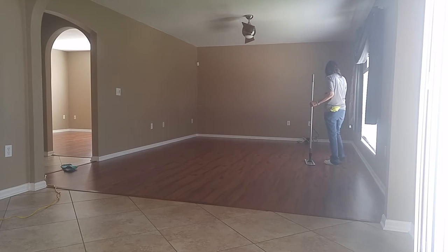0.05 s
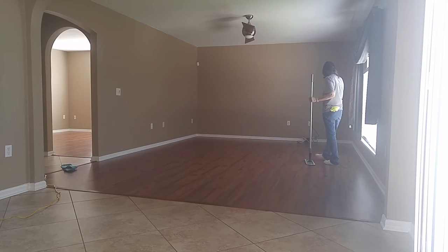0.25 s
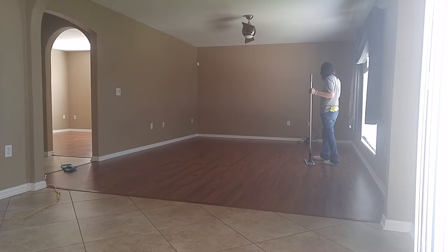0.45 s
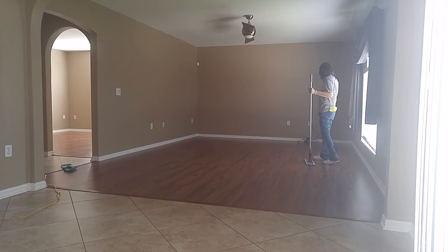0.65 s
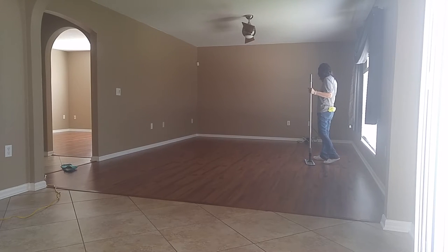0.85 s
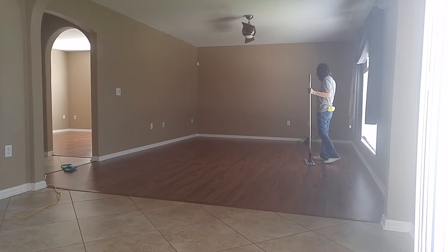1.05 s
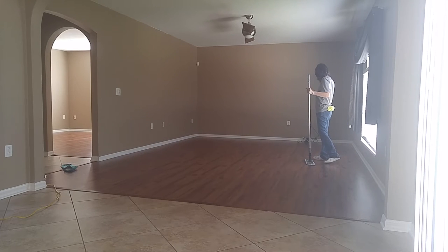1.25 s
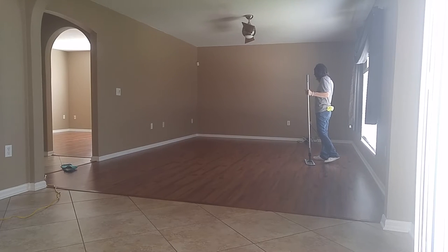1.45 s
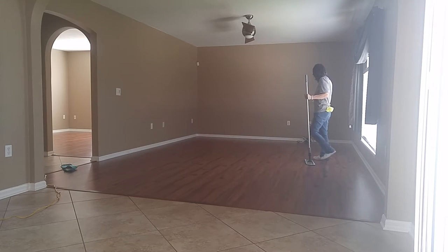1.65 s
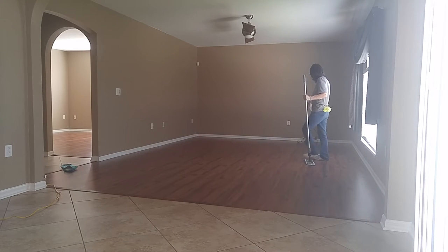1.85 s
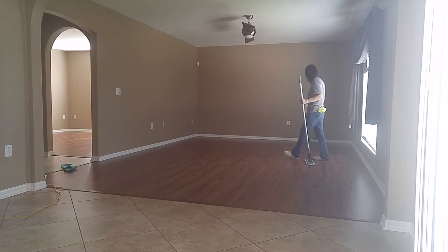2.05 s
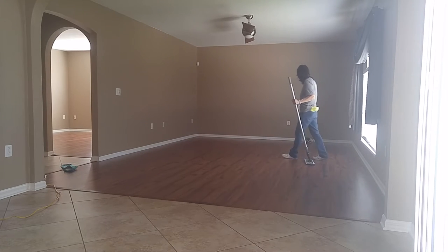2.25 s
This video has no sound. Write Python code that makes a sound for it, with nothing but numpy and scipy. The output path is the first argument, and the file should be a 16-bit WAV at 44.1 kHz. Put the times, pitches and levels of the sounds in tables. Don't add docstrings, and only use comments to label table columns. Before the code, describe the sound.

Mop head clacks on a hard floor with a loose rattle, ringing through a bare room

```python
import sys
import numpy as np
from scipy import signal
from scipy.fft import rfft, irfft, next_fast_len
from scipy.io import wavfile

SR = 44100
rng = np.random.default_rng(int(sys.argv[2]) if len(sys.argv) > 2 else 0)


def gain_from_db(level_db):
    decades = np.asarray(level_db, float) / 20
    return 10 ** decades


def to_wav(s):
    ch = np.atleast_2d(s).T
    pcm = np.round(np.clip(ch, -1, 1) * 32767)
    wavfile.write(sys.argv[1], SR, pcm.astype(np.int16))


N = 101429
SIZE = next_fast_len(2 * N)


def at_hz(points, hz):
    p = np.array(points)
    return np.interp(np.log(np.maximum(hz, 1)), np.log(p[:, 0]), p[:, 1])


def rms_one(x):
    return x / np.sqrt(np.mean(x ** 2))


def colour(x, db_of_hz):
    hz = np.arange(SIZE // 2 + 1) * SR / SIZE
    cepstrum = irfft(db_of_hz(hz) * np.log(10) / 20, SIZE)
    cepstrum[1:SIZE // 2] *= 2
    cepstrum[SIZE // 2 + 1:] = 0
    response = np.exp(rfft(cepstrum))
    return irfft(rfft(x, SIZE) * response, SIZE)[..., :N]


def clicks(rows):
    out = np.zeros(N)
    for s, db in rows:
        out[int(s * SR)] += gain_from_db(db)
    return out


def ring(x, modes):
    out = 0
    for k, (hz, db, t60) in enumerate(modes):
        radius = gain_from_db(-60 / (t60 * SR))
        angle = 2 * np.pi * hz / SR
        gain = (-1) ** k * gain_from_db(db) * np.sin(angle)
        poles = [1, -2 * radius * np.cos(angle), radius * radius]
        out = out + signal.lfilter([0, gain], poles, x + 1e-18)
    return out


CONTACT_HZ = 3560

# t/s, level/dB
KNOCKS = [
    (0.2043, -12),
]
# f/Hz, level/dB, T60/s
HEAD_MODES = [(231.5, -20.5, 0.058), (356.3, 2, 0.048), (399, 0, 0.035), (597, 1.5, 0.027),
              (747, -2, 0.034), (840, 2, 0.02), (1052, -0.5, 0.025), (1265, -0.5, 0.016),
              (1515, -1.5, 0.011), (1964, -4.5, 0.014), (2417, -5, 0.011), (2830, -7.5, 0.0065),
              (3994, -12, 0.025)]


def knock():
    push = signal.lfilter(*signal.butter(2, CONTACT_HZ, fs=SR), clicks(KNOCKS))
    crack = push * gain_from_db(-20)
    blow = ring(push, HEAD_MODES) * gain_from_db(-12) + crack
    return signal.sosfilt(signal.butter(2, 160, "high", fs=SR, output="sos"), blow)


# t/s, level/dB
RATTLE = [
    (0.2043, -35),
    (0.2095, -32),
    (0.2125, -31),
    (0.2155, -32),
]


def rattle():
    t60_s, low_hz, high_hz = 0.015, 2600, 10940
    decay = signal.lfilter([1], [1, -gain_from_db(-60 / (t60_s * SR))], clicks(RATTLE))
    bursts = decay * rng.standard_normal(N)
    band = signal.butter(3, [low_hz, high_hz], "band", fs=SR, output="sos")
    return gain_from_db(0.5) * signal.sosfilt(band, bursts)


# t/s, pressure as drag level/dB, speed as swish level/dB
STROKE = [(0, -49.5, -74), (.06, -50, -67), (.11, -46, -49.5), (.18, -52, -55.5), (.45, -52, -62),
          (.68, -50, -58), (.85, -52.5, -62.5), (.95, -58, -88), (1.08, -58.5, -62.5), (1.17, -51, -65),
          (1.24, -55.5, -92), (1.33, -59, -60), (1.45, -47, -61), (1.559, -49, -62), (1.67, -55, -57.5),
          (1.78, -57.5, -64), (2.0, -59.5, -59), (2.3, -64, -73)]
# f/Hz, level/dB per Hz
DRAG = [(120, -12.5), (300, -6.5), (800, 2.5), (1500, -5), (2200, -4), (3000, -21.5), (4500, -16.5),
        (8000, -40)]
# f/Hz, level/dB per Hz
SWISH = [(1500, -32), (3000, 4), (5000, 2.5), (7000, 4), (10000, 0.5), (13000, 2.5), (15000, 14.5),
         (17000, -28)]


def cloth():
    grains_per_s, grain_spread_db = 2500, 2.5
    squeak_hz, squeak_db, squeak_peak_s, squeak_s = 1736, -63, .1, .09
    s, drag_db, swish_db = np.transpose(STROKE)
    t = np.arange(N) / SR
    struck = rng.random((2, N)) < grains_per_s / SR
    grains = struck * gain_from_db(grain_spread_db * np.minimum(rng.exponential(1, (2, N)), 3))
    grains = rms_one(grains * rng.choice([-1, 1], (2, N))) + .8 * rng.standard_normal((2, N))
    drag = rms_one(colour(grains, lambda hz: at_hz(DRAG, hz)))
    drag = drag * gain_from_db(np.interp(t, s, drag_db))
    swish = rms_one(colour(rng.standard_normal((2, N)), lambda hz: at_hz(SWISH, hz)))
    swish = swish * gain_from_db(np.interp(t, s, swish_db))
    swell = np.exp(-((t - squeak_peak_s) / squeak_s) ** 2)
    squeak = gain_from_db(squeak_db) * np.sin(2 * np.pi * squeak_hz * t) * swell
    return ports(*(drag + swish + squeak))


# t/s, level/dB
CATCHES = [(1.44, -45), (1.456, -40), (1.474, -35), (1.521, -41), (1.561, -36), (1.6, -38)]
# f/Hz, level/dB, T60/s
SEAM_MODES = [(680, 0, .018), (980, -1, .015), (1500, -5, .012), (2100, -5, .012), (3400, -9, .008)]
# t/s, level/dB
REBOUND = (0.4075, -23)
# f/Hz, level/dB, T60/s
REBOUND_MODES = [(740, 0, .04), (960, -12, .03)]


def catches():
    soft = signal.butter(1, CONTACT_HZ, fs=SR)
    seams = ring(signal.lfilter(*soft, clicks(CATCHES)), SEAM_MODES)
    rebound = ring(signal.lfilter(*soft, clicks([REBOUND])), REBOUND_MODES)
    return seams + rebound


# t/s, level/dB
TICK = (1.8289, -12.5)
# lower f/Hz, upper f/Hz, level/dB
JOINT = [(6400, 7400, 0), (8300, 10500, -10), (2000, 6000, -17)]


def tick():
    out = 0
    for low_hz, high_hz, db in JOINT:
        band = signal.butter(2, [low_hz, high_hz], "band", fs=SR, output="sos")
        out = out + gain_from_db(db) * signal.sosfilt(band, clicks([TICK]) + 1e-18)
    return out


# f/Hz, share/1
LIKENESS = [(60, .99), (130, .9), (350, .94), (640, .5), (1400, .38), (3000, .25), (7000, .15), (15000, .1)]
# f/Hz, lag/s
LEFT_LAG_S = [(100, .00005), (600, .00012), (1400, .00034), (15000, .00032)]


def ports(a, b):
    hz = np.arange(SIZE // 2 + 1) * SR / SIZE
    alike = at_hz(LIKENESS, hz)
    delay = np.exp(-2j * np.pi * hz * at_hz(LEFT_LAG_S, hz))
    left = alike * rfft(a, SIZE) * delay + np.sqrt(1 - alike ** 2) * rfft(b, SIZE)
    return np.array([irfft(left, SIZE)[:N], a])


# f/Hz, T60/s
DECAY = [(100, 1.2), (300, 0.66), (700, 0.86), (1400, 1.12), (2500, .8), (5000, 0.6), (8000, 0.69),
         (12000, 0.28)]


def room(x, echoes, tail_db):
    hall_db, hall_t60_s, rise_s, echo_spread_s = -56.5, 3.1, .008, .0004
    t = np.arange(N) / SR
    edges = 60 * 2 ** np.arange(0, 8.3, .5)
    white = rng.standard_normal((2, 2, N))
    hall = gain_from_db(hall_db - 60 * t / hall_t60_s)
    tail = 0
    for k, (low, high) in enumerate(zip(edges, edges[1:])):
        half_octave = signal.butter(2, [low, high], "band", fs=SR, output="sos")
        band = signal.sosfilt(half_octave, white[k % 2])
        t60 = at_hz(DECAY, np.sqrt(low * high))
        tail = tail + band * (gain_from_db(tail_db - 60 * t / t60) + hall * (t60 / 0.72) ** 2)
    reflected = np.arange(len(echoes)) > 0
    lags = LEFT_LAG_S[-1][1] - echo_spread_s * rng.random(len(echoes)) * reflected
    left = clicks([(s + .0002 + lag, db) for (s, db), lag in zip(echoes, lags)])
    right = clicks([(s + .0002, db) for s, db in echoes])
    answer = ports(*(tail * (1 - np.exp(-t / rise_s)))) + [left, right]
    return irfft(rfft(answer, SIZE) * rfft(x, SIZE), SIZE)[:, :N]


# f/Hz, level/dB per Hz
AIR = [(25, -35), (60, 1.5), (100, -2.5), (260, -12.5), (800, -7.5), (2000, -19.5), (4000, -28),
       (15000, -35)]
# f/Hz, width/Hz, level/dB
HUM = [(64.7, 19, -62), (159.6, 16, -65), (256.8, 16, -62.5), (354.8, 9.4, -64)]
# t/s, level/dB
AIR_SWELL = [(0, 5.5), (.7, 1), (1.5, 1), (1.8, -3), (2.3, -2.5)]


def air():
    out = gain_from_db(-52.5) * rms_one(colour(rng.standard_normal((2, N)), lambda hz: at_hz(AIR, hz)))
    white = rng.standard_normal((2, N + SR))
    for hz, width_hz, db in HUM:
        out = out + gain_from_db(db) * rms_one(ring(white, [(hz, 0, 3.2 / width_hz)])[:, SR:])
    return ports(*out) * gain_from_db(np.interp(np.arange(N) / SR, *np.transpose(AIR_SWELL)))


# delay t/s, level/dB
ECHOES = [(0, -2), (.0025, 0), (.0058, -1), (.0095, -3), (.0178, -1), (.027, -3), (.043, -6)]
# delay t/s, level/dB
RATTLE_ECHOES = [(0, 0), (.0025, -4), (.0095, -7), (.0178, -9)]
# delay t/s, level/dB
TICK_ECHOES = [(0, -8), (.0027, -9), (.006, -11), (.0077, 0), (.0113, -5), (.0137, -10), (.0157, -5),
               (.0218, -6), (.0265, -11)]


def scene():
    near = room(knock(), ECHOES, -24) + room(rattle(), RATTLE_ECHOES, -27.5)
    far = room(catches(), RATTLE_ECHOES[:2], -37.5) + room(tick(), TICK_ECHOES, -26)
    return near + far + cloth() + air()


# f/Hz, level/dB
LEFT_PORT = [(900, -.5), (1400, -6), (2200, -4), (3200, 1), (5000, -4), (7000, -12), (9800, -16),
             (12500, -2)]
# f/Hz, level/dB
RIGHT_PORT = [(100, -0.5), (1500, 7), (3200, 1.5), (5000, 3.5), (7000, 11), (9500, 9.5), (11500, 3.5),
              (15000, -11.5)]
# f/Hz, width/Hz, depth/dB
DIPS = [(524, 44.4, -7.5), (7830, 335, -7.5)]


def microphones(dry):
    def dips(hz):
        return sum(db * np.exp(-((hz - dip_hz) / width_hz) ** 2) for dip_hz, width_hz, db in DIPS)

    dry = signal.sosfilt(signal.butter(3, 40, "high", fs=SR, output="sos"), dry)
    whine = gain_from_db(-77.5) * rms_one(ring(rng.standard_normal(N), [(11700, 0, .03)]))
    left = whine + colour(dry[0], lambda hz: at_hz(LEFT_PORT, hz) + at_hz(RIGHT_PORT, hz) + dips(hz))
    right = colour(dry[1], lambda hz: at_hz(RIGHT_PORT, hz) + dips(hz))
    hiss_band = signal.butter(1, [2000, 12000], "band", fs=SR)
    hiss = gain_from_db(-66) * signal.lfilter(*hiss_band, rng.standard_normal((2, N)))
    top = signal.ellip(12, .5, 60, 15770, fs=SR, output="sos")
    return signal.sosfilt(top, np.array([left, right]) + hiss)


def roll_off(x):
    return signal.sosfilt(signal.butter(12, 15780, fs=SR, output="sos"), x)


def record(dry):
    mix = microphones(dry)
    return roll_off(mix)


dry = scene()
out = record(dry)
to_wav(out)
```